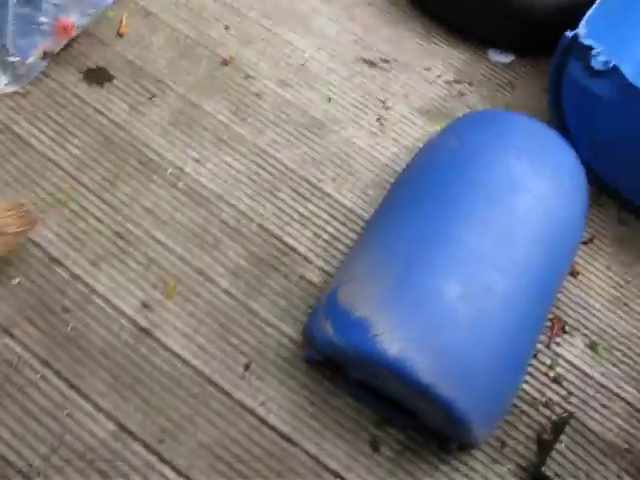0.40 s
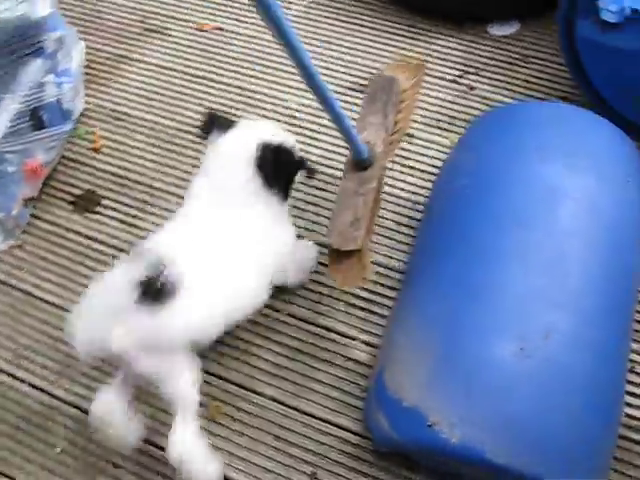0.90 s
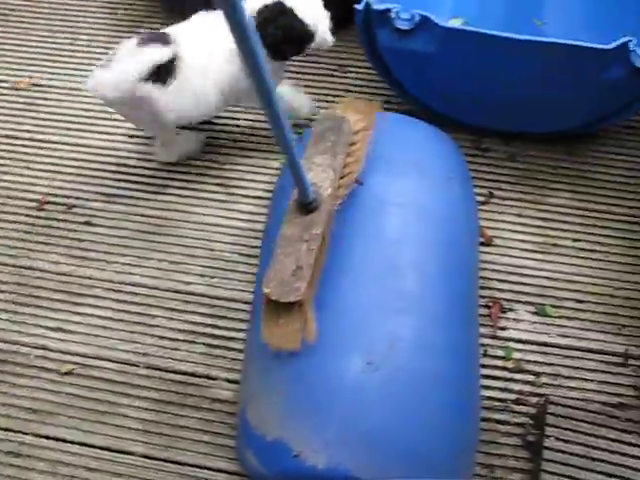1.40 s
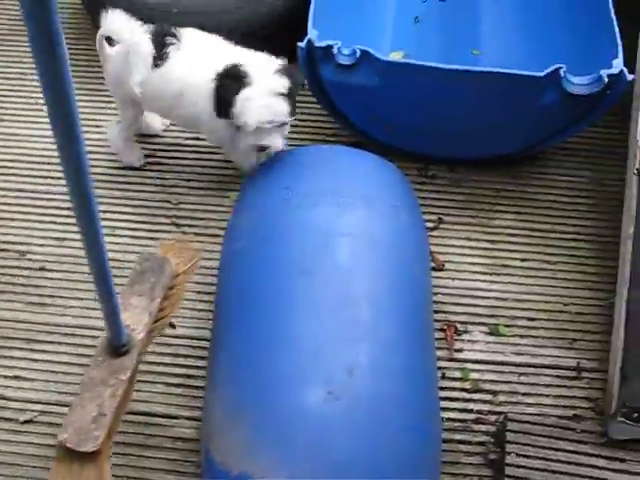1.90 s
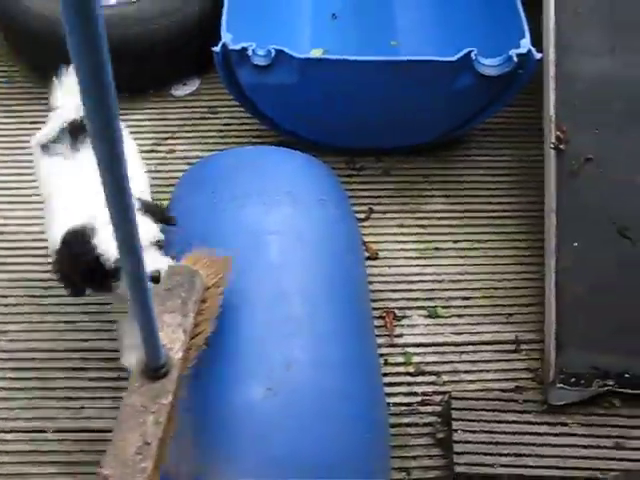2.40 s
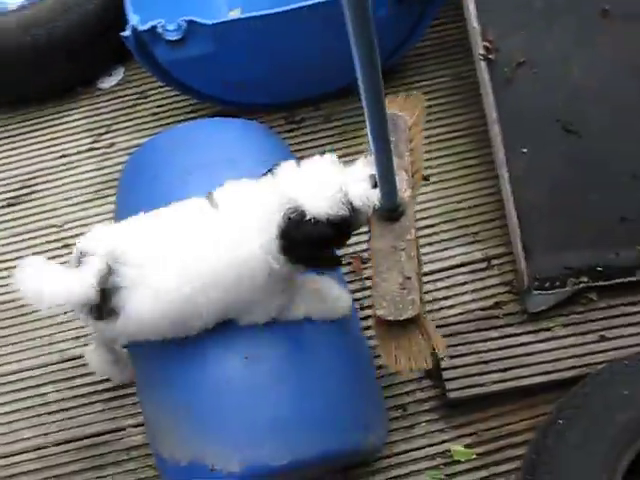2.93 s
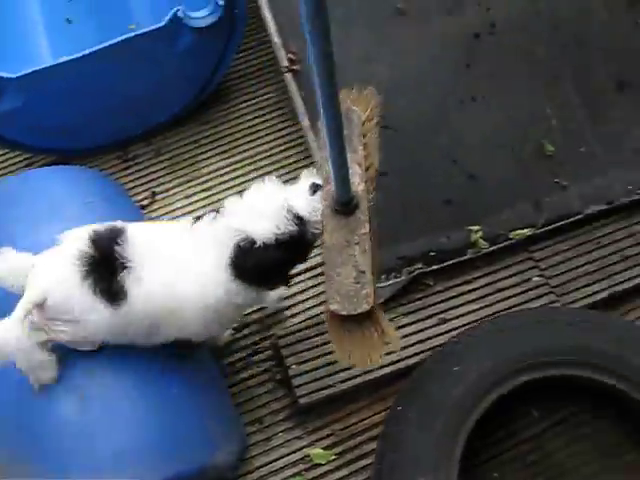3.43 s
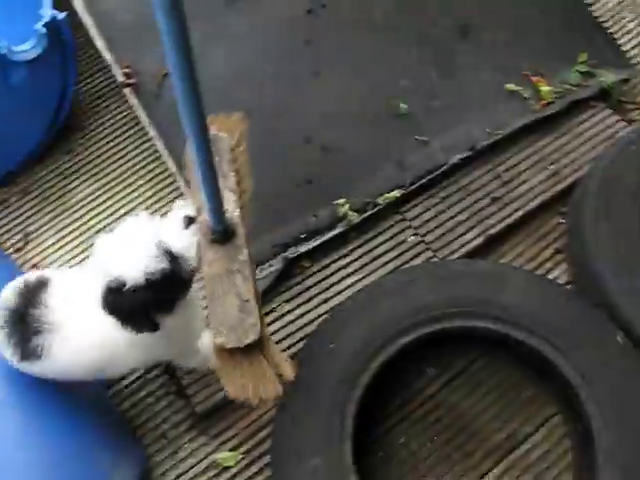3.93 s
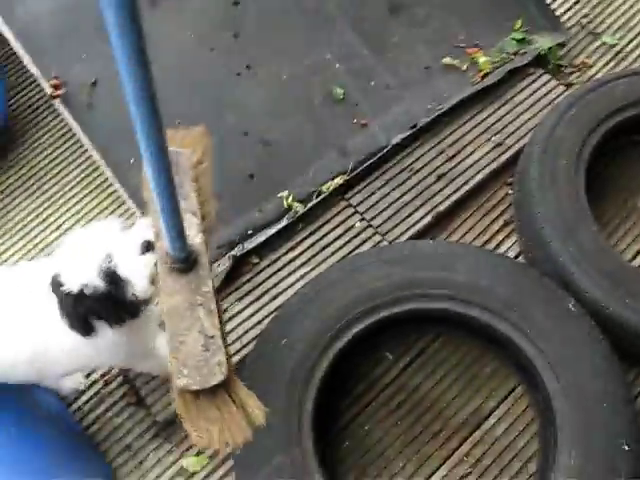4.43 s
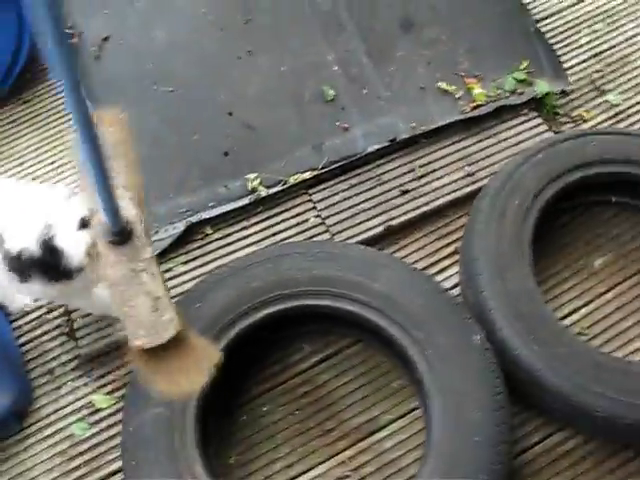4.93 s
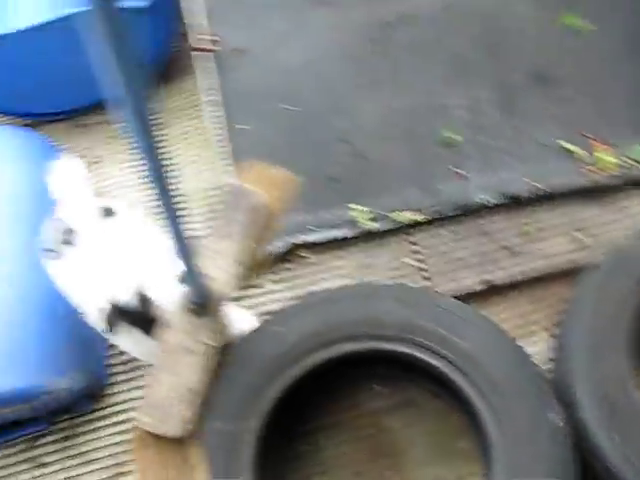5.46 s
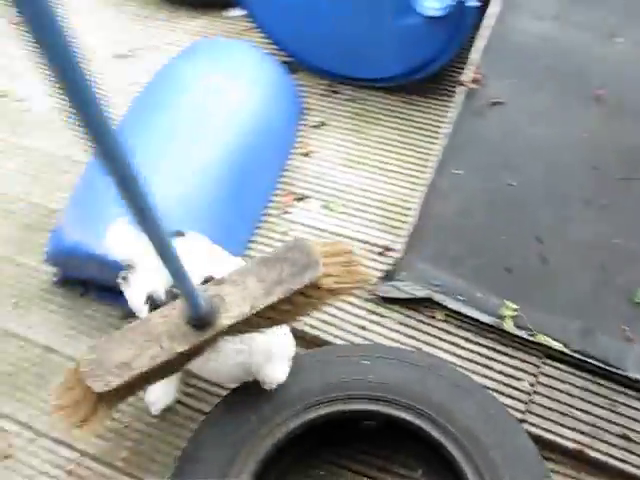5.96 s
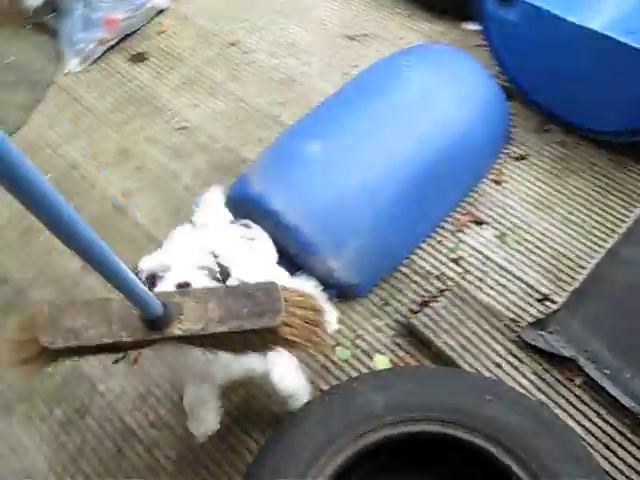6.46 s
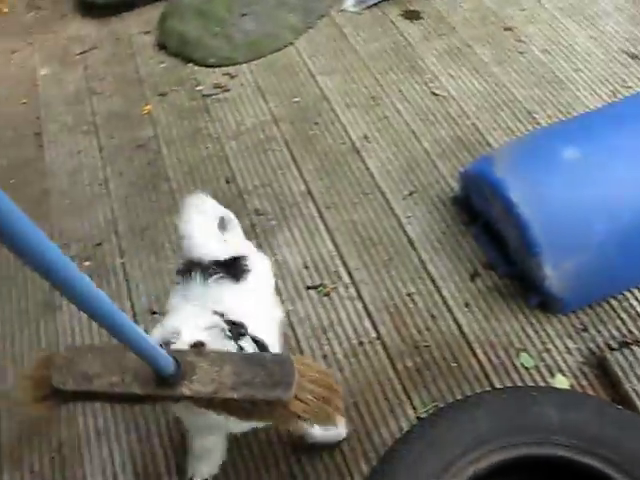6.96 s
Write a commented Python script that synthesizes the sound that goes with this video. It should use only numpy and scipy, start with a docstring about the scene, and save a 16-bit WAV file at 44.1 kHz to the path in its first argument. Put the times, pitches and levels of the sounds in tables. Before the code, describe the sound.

A puppy scrambles after a stiff broom on deck boards, with bristly scuffs, sharp claw clicks, hollow plastic barrel booms and quick little pants.

```python
"""A short scuff of bristles, then a soft thump and hard claw snaps: a puppy chases a stiff broom over
grooved deck boards and scrambles across a hollow plastic barrel. Bristles and paws scuff as clumps of tiny
slips, claws and teeth snap as bursts of cracks in small resonances, and the barrel booms as a bank of shell
modes. Pants and broom-head drags are noise in gliding resonances; shaped noise lies under it as the yard."""
import sys
import numpy as np
from scipy import signal
from scipy.io import wavfile
from scipy.ndimage import uniform_filter1d

SR = 44100
rng = np.random.default_rng(int(sys.argv[2]) if len(sys.argv) > 2 else 0)


def pcm_store(signal):
    """Save signal as 16-bit PCM."""
    levels = np.round(np.clip(np.atleast_2d(signal), -1, 1) * 32767)
    wavfile.write(sys.argv[1], SR, levels.astype(np.int16).T)


def rack_gain(trim_db):
    """Turn a fader trim in dB into the linear factor to multiply a signal by."""
    fader = np.asarray(trim_db, float)
    return 10 ** (fader / 20)


N = 313110  # samples


def evened(x):
    """Scales to unit power."""
    return x / np.sqrt(np.mean(x ** 2) + 1e-20)


def add(mix, s, sound):
    """Mixes a sound in at time s, cut off at the end of the mix."""
    part = mix[round(s * SR):][:len(sound)]
    part += sound[:len(part)]


def resonate(x, hz, width_hz):
    """Shifts the pitch curve hz down to zero, smooths, and shifts back: a resonance of gain 1."""
    turn = np.exp(2j * np.pi * np.cumsum(hz * np.ones(len(x))) / SR)
    decay = np.exp(-np.pi * width_hz / SR)
    return 2 * (turn * signal.lfilter([1 - decay], [1, -decay], x / turn)).real


def band(x, lo_hz, hi_hz, order=2):
    """Band-pass."""
    sos = signal.butter(order, [lo_hz, min(hi_hz, SR / 2.1)], "band", fs=SR, output="sos")
    return signal.sosfilt(sos, x)


# Spectrum of the yard noise. Each row: frequency in Hz, relative level in dB.
YARD_SPECTRUM = [(15, -51), (25, -6), (58, -14), (105, -1), (304, 2), (445, 0), (524, 0.5), (617, 0.5),
                 (687, 0.5), (1120, 0.5), (1680, -7.5), (1830, -8), (14800, -29.5), (16500, -28)]
YARD_DB = -47  # overall rms


def yard():
    """Distant traffic and air: random short-time spectra with faint patches."""
    frames, hz = N // 256 + 5, np.fft.rfftfreq(1024, 1 / SR)
    a, b, patches = rng.standard_normal((frames, 513, 3)).T
    patches = uniform_filter1d(patches, size=12, axis=0)  # over frequency
    patches = evened(uniform_filter1d(patches, size=14, axis=1))  # over time
    f, db = np.transpose(YARD_SPECTRUM)
    spectrum_db = np.interp(np.log(hz + 1), np.log(f + 1), db)
    z = (a + 1j * b) * rack_gain(spectrum_db[:, None] + 2.04 * patches)
    noise = signal.istft(z, nperseg=1024, noverlap=768)[1][:N]
    return rack_gain(YARD_DB) * evened(noise)


PATCHY_DB = 2.6  # rms depth of the colour patches


def patchy(x):
    """Bristles of different length come and go: the colour shifts in patches of about 500 Hz by 25 ms."""
    z = signal.stft(x, nperseg=256, noverlap=192)[2]
    patches = uniform_filter1d(rng.standard_normal(z.T.shape), size=16, axis=0)
    patches = evened(uniform_filter1d(patches, size=3, axis=1))
    return signal.istft(z * rack_gain(PATCHY_DB * patches.T), nperseg=256, noverlap=192)[1][:len(x)]


def scrape(level_db, hz, treble_db, grit_db=2.5, slips_per_s=6000, ticks_per_s=50):
    """Dense tiny slips of uneven size in clumps: rasp, broad scrape, treble hiss, bristles flicking free."""
    n = len(level_db)
    chance, sign, size = rng.random(n), rng.standard_normal(n), rng.exponential(1, n)
    clumps = rack_gain(1.9 * evened(uniform_filter1d(rng.standard_normal(n), size=180)))
    big_slips = (chance < slips_per_s / SR) * rack_gain(grit_db * np.minimum(size, 5))
    slips = evened(clumps * sign * (2.1 + big_slips))
    ticks = np.sign(sign) * (chance > 1 - ticks_per_s / SR) * rack_gain(0.87 * np.minimum(size, 3))
    slips = slips + 4 * ticks

    rasp = evened(resonate(resonate(slips, hz, 2000), hz, 2000))
    broad = evened(band(slips, 1100, 6030, order=1))
    body = evened(patchy(band(rasp + 6.5 * broad, 790, 7960)))

    fine, finest = slips * rng.choice([-1., 1.], (2, n))  # same grain, unrelated phase
    hiss = evened(band(fine, 5700, 12400, order=1)) + evened(band(finest, 10500, 15400))
    return rack_gain(level_db) * (0.7 * body + 0.42 * rack_gain(treble_db) * hiss)


RASP_HZ = 3100  # rasp pitch at full pressure

# Fur, paws and bristles in light contact between the strokes; values glide from row to row.
# Each row: time in seconds, level in dB, treble hiss gain in dB against that level.
SHUFFLE_CURVE = [(0.0, -51, -3), (0.3, -49, 2), (1.7, -53, -3), (2.45, -56, -1), (2.77, -46.5, -7),
                 (3.5, -41, -1), (3.6, -50, 0), (4.31, -52.5, -0.5), (4.61, -54.5, -2), (4.73, -47.5, -10),
                 (5.26, -46, -2), (5.56, -45.5, -7), (5.99, -44, -5), (6.53, -51.5, -1), (6.76, -45.5, -3),
                 (7.1, -55, -4)]


def shuffle():
    """The grain of the scrape, faint and unbroken."""
    s, level_db, treble_db = np.transpose(SHUFFLE_CURVE)
    t = np.arange(N) / SR
    return scrape(np.interp(t, s, level_db), RASP_HZ, np.interp(t, s, treble_db))


def rush(s, length, db, hz, width_hz):
    """Noise through a gliding resonance, with a thin whistle in it and a second resonance below or above."""
    air = rng.standard_normal(round(length * SR))
    glide = np.linspace(hz, 0.93 * hz, len(air))  # ends a little lower than it starts
    other = glide * (0.62 if hz > 4800 else 1.63)
    main = resonate(resonate(air, glide, width_hz), glide, width_hz)
    second = resonate(resonate(air, other, 500), other, 500)
    whistle = evened(resonate(air, glide, 90))
    puff = evened(main + 0.3 * second) + 0.18 * whistle
    return s, rack_gain(db) * evened(puff) * signal.windows.tukey(len(air), .35)


# The puppy's breaths. Each row: start in seconds, length in seconds, level in dB,
# mouth resonance at the start in Hz, width of each of its two passes in Hz.
PANTS = [(4.55, 0.11, -45, 2660, 250), (4.635, 0.104, -43, 3000, 453), (4.81, 0.13, -46, 5670, 1500),
         (4.985, 0.078, -41.5, 5550, 1100), (5.084, 0.13, -39, 5450, 1500), (5.204, 0.089, -38, 4270, 1210),
         (5.33, 0.079, -45, 4220, 1500), (5.459, 0.055, -43, 5050, 1510)]


def pant(s, length, db, mouth_hz, width_hz):
    """One breath: a rush of air coloured by the mouth."""
    return rush(s, length, db, mouth_hz, width_hz)


# The wooden broom head on the boards. Each row: start in seconds, length in seconds, level in dB,
# resonance at the start in Hz, width of each of its two passes in Hz.
DRAGS = [(0.232, 0.043, -46.5, 760, 200), (1.411, 0.036, -46, 3060, 250), (5.902, 0.033, -42, 2750, 500),
         (6.046, 0.0127, -38, 2730, 600), (6.89, 0.012, -45, 1570, 400), (2.655, 0.042, -36, 1080, 300),
         (4.763, 0.034, -41, 1810, 370), (5.167, 0.037, -35, 1620, 503), (5.946, 0.099, -38.5, 1680, 500),
         (6.735, 0.086, -34, 3540, 1200), (6.936, 0.015, -37, 1520, 700)]


def drag(s, length, db, wood_hz, width_hz):
    """One drag of the broom head: friction noise coloured by the wood."""
    return rush(s, length, db, wood_hz, width_hz)


# Modes of the barrel shell. Each row: frequency in Hz, width in Hz,
# relative strength in dB before division by the root of the width.
BARREL_MODES = [(88, 13, -17), (154, 26, -5.5), (250, 35, -2), (330, 53, -3.5), (403, 29.5, -0.5),
                (504, 61, -2.5), (600, 17, -6.5), (740, 150, -5.5), (1117, 79, -3), (1290, 400, -4)]


def barrel(drive, lean_hz, lean_db, deep_db):
    """The shell modes; those near lean_hz are lifted, and those below 200 Hz shift by deep_db."""
    boom = np.zeros(len(drive))
    for k, (hz, width_hz, db) in enumerate(BARREL_MODES):
        near_db = lean_db * np.exp(-(np.log(hz / lean_hz) / 0.3) ** 2) + deep_db * (hz < 200)
        mode = rack_gain(db + near_db) * resonate(drive, hz, width_hz) / np.sqrt(width_hz)
        boom += (-1) ** k * mode  # neighbours in opposite phase
    return boom


# The barrel rocks and grinds on the boards; the level glides from row to row.
# Each row: time in seconds, driving level in dB.
ROCKING = [(3.775, -39), (3.822, -15.5), (3.845, -14), (3.878, -19), (3.892, -31), (3.97, -53)]


def rocking(rows):
    """Rough rolling contact: softened noise shakes all the shell modes."""
    s, level_db = np.transpose(rows)
    t = np.arange(s[0], s[-1], 1 / SR)
    roughness = uniform_filter1d(rng.standard_normal(len(t)), size=32)
    boom = barrel(rack_gain(np.interp(t, s, level_db)) * roughness, 393, lean_db=6, deep_db=-3.0)
    rms_db = np.max(level_db) - 7.0
    return s[0], rack_gain(rms_db) * evened(boom) * signal.windows.tukey(len(t), .1)


# Paws landing on barrel and boards. Each row: start in seconds, peak level in dB,
# contact time in seconds (0.0005 at least), 60 dB decay of the chatter in seconds, favoured mode in Hz.
THUMPS = [(0.091, -37, 0.0027, 0.1, 230), (0.299, -30, 0.0011, 0.15, 483),
          (0.372, -29.5, 0.0018, 0.35, 278), (0.67, -20, 0.0021, 0.34, 310),
          (0.809, -26.5, 0.0029, 0.12, 553), (0.906, -35, 0.0035, 0.45, 495),
          (2.182, -30, 0.00089, 0.22, 305), (2.196, -26, 0.0047, 0.22, 185),
          (2.344, -38, 0.0035, 0.53, 193), (2.447, -36.5, 0.0027, 0.6, 253), (2.56, -14, 0.002, 0.48, 480),
          (2.665, -22, 0.0022, 0.19, 400), (2.673, -21.5, 0.0039, 0.35, 140),
          (2.749, -29, 0.00091, 0.29, 159), (2.814, -24.5, 0.00075, 0.68, 504),
          (2.853, -24, 0.003, 0.5, 423), (2.915, -23, 0.0011, 0.15, 310), (2.923, -10, 0.0033, 0.17, 387),
          (3.041, -22, 0.0044, 0.36, 407), (3.648, -28.5, 0.0031, 0.61, 376),
          (3.781, -20, 0.0045, 0.29, 156), (5.175, -43, 0.0042, 0.34, 208), (5.695, -34, 0.0029, 0.2, 212),
          (6.014, -33.5, 0.0032, 0.12, 140), (6.213, -36, 0.0022, 0.27, 330),
          (6.277, -28.5, 0.00046, 0.033, 780), (6.434, -30, 0.0026, 0.1, 250),
          (6.809, -33, 0.004, 0.18, 210), (6.983, -36.5, 0.0016, 0.54, 396)]
DEEP_DB, DEEP_DB_PER_S = -5.5, 24.5  # the longer the shell chatters, the more its deep modes sound


def thump(s, peak_db, contact, t60, hz):
    """A soft push with a harder claw knock at its start, then the shell chatters on against the boards."""
    t = np.arange(round(.3 * SR)) / SR
    push = np.sin(2 * np.pi * np.minimum(t[:600] / max(contact, .0005), 1))  # one cycle: in and back
    push[:12] += 5.0  # claw knock
    hits = rng.random(len(t)) < 1500 / SR  # about 1500 bounces per second
    bounces = .13 * rng.standard_normal(len(t)) * hits * rack_gain(-60 * t / max(t60, .01))
    bounces[0] = 1  # the landing itself
    drive = signal.oaconvolve(bounces, push)[:len(t)]
    boom = barrel(drive, hz, 10.6, DEEP_DB + DEEP_DB_PER_S * t60)
    return s, rack_gain(peak_db) * boom / abs(boom).max()


# Claws and teeth on hard surfaces. Each row: start in seconds, peak level in dB, burst length in seconds,
# favoured ring in Hz, dull body in dB (gain of the rings below 4500 Hz, ahead of a shared 22 dB lift).
SNAPS = [(0.188, -20, 0.0018, 5850, -11), (0.206, -9, 0.0028, 7540, -30), (0.314, -32, 0.0028, 3690, -11),
         (0.35, -28, 0.002, 3700, 2), (0.374, -19.5, 0.0017, 5570, -23), (0.395, -23, 0.0019, 2920, -18),
         (0.4217, -22.5, 0.0013, 2910, 0), (0.4417, -16.5, 0.00047, 3020, -25),
         (0.523, -27.5, 0.002, 6480, -14), (0.5601, -4, 0.0021, 7800, -20),
         (0.532, -30, 0.0015, 12000, -20), (0.601, -27, 0.002, 13400, -23), (0.611, -30, 0.002, 13500, -22),
         (0.621, -34, 0.003, 13400, -21), (0.6406, -27, 0.0022, 3100, -8), (0.676, -18, 0.0009, 2620, -25),
         (0.7768, -15.5, 0.0022, 3100, -27), (0.8007, -4.5, 0.00088, 9450, 3.5),
         (0.815, -21, 0.005, 3150, -17), (0.9118, -25, 0.0086, 3520, -27),
         (0.9557, -29, 0.0024, 13100, -26), (1.079, -32, 0.0021, 1980, -16),
         (1.092, -20, 0.0011, 13300, -31), (1.1493, -32, 0.0022, 2030, -12), (1.436, -38, 0.002, 8100, -25),
         (1.682, -37, 0.0023, 2390, 0), (1.548, -31, 0.0017, 2170, 6), (1.9237, -2.5, 0.0055, 8500, -7),
         (2.494, -35, 0.0024, 2540, -24), (2.56, -31, 0.011, 2440, -25), (2.663, -30, 0.0013, 2000, -4),
         (2.6886, -25, 0.0056, 3300, -26), (2.809, -24, 0.0048, 6000, -17), (2.9495, -24, 0.0028, 3100, -8),
         (3.2312, -24, 0.002, 6360, -11), (4.039, -29, 0.0011, 1990, 14), (4.0564, -27, 0.0042, 1950, -22),
         (4.0784, -25, 0.0016, 3370, -19), (4.1775, -21, 0.0024, 5000, -17),
         (4.2187, -14.5, 0.0015, 5300, -30), (4.338, -30, 0.0055, 5730, -11),
         (4.377, -31.5, 0.0014, 1930, -7), (4.7681, -19, 0.0015, 2840, -25),
         (4.921, -19.5, 0.0016, 5640, -17), (4.9711, -16.5, 0.0012, 7650, 6),
         (5.0426, -3.5, 0.0019, 9200, -10), (5.1492, -18, 0.0018, 5300, -11), (5.32, -3, 0.00058, 8000, -2),
         (5.399, -23.5, 0.0015, 2910, -18), (5.455, -25, 0.0036, 7740, -17), (5.471, -20, 0.0033, 4940, 0),
         (5.7596, -23, 0.0015, 2280, -23), (5.913, -21.5, 0.005, 2630, -2), (6.0877, -23, 0.0013, 3570, -7),
         (6.1837, -13, 0.0035, 7900, 17), (6.212, -25, 0.0015, 5600, 2), (6.2761, -21, 0.0029, 4140, -20),
         (6.338, -10, 0.0013, 7100, -20), (6.544, -12.5, 0.0029, 3100, -43), (6.558, -29, 0.001, 8000, -18),
         (6.576, -24, 0.00093, 5000, -15), (6.8454, -17.5, 0.0014, 8550, -10),
         (6.9378, -23, 0.0015, 1790, -8), (6.9504, -26, 0.001, 5000, -9)]
# Rings of the small stiff objects. Each row: frequency in Hz,
# base width in Hz (it sounds at 300 Hz plus 3.6 times this), relative level in dB.
SNAP_RINGS = [(2100, 170, -3), (3700, 520, -23), (5150, 99, 11.5), (7850, 160, 18), (9450, 180, 6),
              (9250, 130, -35.5), (12020, 350, 6), (12200, 280, -1.5)]


def snap(s, peak_db, burst, lean_hz, body_db):
    """A few milliseconds of tiny cracks ring a small stiff object; modes near lean_hz are favoured."""
    t = np.arange(round(.04 * SR)) / SR
    decay = rack_gain(-60 * np.maximum(t - burst, 0) / 0.004)  # steady for the burst, then 60 dB in 4 ms
    cracks = rng.standard_normal(len(t)) * (rng.random(len(t)) < .25) * decay
    cracks[0] = 3.2  # first contact
    ring = np.zeros(len(t))
    for hz, base_hz, db in SNAP_RINGS:
        gain_db = db + (body_db + 22.0) * (hz < 4500) - 2.3 * abs(np.log2(hz / lean_hz))
        ring += rack_gain(gain_db) * resonate(cracks, hz, 300 + 3.6 * base_hz)
    own = resonate(cracks, lean_hz, 0.75 * lean_hz)  # the claw's own note
    own = resonate(own, lean_hz, 0.75 * lean_hz)
    ring = band(ring / abs(ring).max() + 0.76 * own / abs(own).max(), 1170, 14400)
    return s, rack_gain(peak_db) * ring / abs(ring).max()


# Strokes of bristles and paws. Each row: start in seconds, swell in seconds, fade in seconds,
# level at full pressure in dB, treble hiss gain in dB against that level.
SCUFFS = [(0.0, 0.0072, 0.04, -34.5, -2.5), (.065, .02, 0.068, -51, 9), (.136, 0.0063, 0.069, -36.5, -2),
          (.155, 0.052, 0.11, -30, -6), (.2, 0.064, 0.034, -28.5, -9), (.31, 0.044, 0.068, -38, -14),
          (.372, 0.0037, 0.067, -36, 2), (0.421, 0.0028, 0.075, -35, -17), (.445, 0.027, 0.047, -38, -4),
          (0.601, 0.0022, 0.051, -52, 8), (.865, 0.058, 0.04, -38, 0), (1.7, 0.027, 0.066, -48.5, -12),
          (5.292, 0.0073, 0.016, -33.5, -3), (6.883, 0.015, 0.017, -39, -9), (.674, 0.0024, 0.095, -25, -5),
          (.69, 0.026, 0.041, -21.5, -4.5), (0.757, 0.023, 0.16, -37.5, -8), (.81, 0.0034, 0.51, -42, -7),
          (1.002, 0.027, .1, -53, -10), (1.542, 0.008, 0.0098, -41.5, -21), (1.963, 0.0085, 0.2, -42, -22),
          (2.34, 0.0027, 0.13, -37.5, -3), (2.441, 0.055, 0.015, -45, -1), (2.576, 0.0097, 0.037, -26, 1),
          (2.661, 0.11, 0.29, -34, -7.5), (2.811, 0.0024, 0.13, -26, -4), (2.951, 0.0033, 0.13, -24.5, -4),
          (2.97, 0.038, 0.053, -19, -6), (3.05, 0.045, 0.48, -46, -10), (3.17, 0.071, 0.043, -31, -16),
          (3.275, 0.04, 0.2, -30.5, -1.5), (3.41, .064, 0.14, -33.5, -16), (3.491, 0.078, 0.1, -24, -7),
          (3.679, 0.031, 0.14, -41.5, -3), (3.769, 0.049, .1, -34, -6), (3.906, 0.044, 0.035, -26.5, -13),
          (4.038, 0.021, 0.06, -39, -16), (4.17, 0.058, 0.061, -37.5, -4),
          (4.55, 0.0047, 0.26, -39.5, -6.5), (4.7, 0.097, 0.034, -37, -2.5), (4.81, 0.046, 0.2, -38, -5),
          (5.06, 0.1, 0.11, -37.5, -10), (5.149, 0.026, 0.13, -28, -10), (5.31, 0.0049, 0.17, -32, -8),
          (5.409, 0.061, .18, -41, -17), (5.596, 0.047, 0.056, -31.5, -3), (5.711, 0.079, .1, -35, -10),
          (5.77, 0.057, 0.087, -31.5, -4.5), (5.905, 0.041, 0.29, -32.5, -1),
          (5.959, 0.039, .08, -30.5, -2.5), (6.059, 0.056, 0.17, -39.5, -18),
          (6.221, 0.078, 0.16, -40.5, -10), (6.335, 0.002, 0.01, -24, -21), (6.549, .003, 0.062, -39, 3),
          (6.56, 0.089, 0.23, -35, -9.5), (6.7, .08, 0.088, -26, -7.5), (6.91, 0.047, 0.016, -39.5, -20),
          (6.959, 0.064, 0.082, -33.5, -5.5)]
TOUCH_DB, FADE_DB = -11, -26  # level at first touch and after the fade time, against full pressure
RASP_SAG_HZ_PER_DB = 71  # the rasp sinks as the pressure eases


def scuff(s, swell, fade, peak_db, treble_db):
    """One stroke: it touches down, presses up to its peak and eases off."""
    t = np.arange(round(.5 * SR)) / SR
    pressure_db = np.where(t < swell, TOUCH_DB * (1 - t / swell), FADE_DB * (t - swell) / fade)
    hz = np.maximum(RASP_HZ + RASP_SAG_HZ_PER_DB * pressure_db, 1500)
    stroke = scrape(peak_db + pressure_db, hz, treble_db)
    return s, stroke * signal.windows.tukey(len(t), .008)


def scene():
    """All sources in the open air, with a quick echo from the deck."""
    near = shuffle()
    for source, table in ((pant, PANTS), (drag, DRAGS), (thump, THUMPS), (snap, SNAPS), (scuff, SCUFFS)):
        for row in table:
            add(near, *source(*row))
    add(near, *rocking(ROCKING))
    echo = np.zeros(N)
    add(echo, .0031, rack_gain(-28) * near)
    return (near + echo + yard())[None]


def roll_off(x):
    """The treble ends steeply here."""
    return signal.sosfilt(signal.butter(12, 16980, fs=SR, output="sos"), x)


def record(dry):
    """The small microphone's bass cut at 62 Hz and band limit at 15.9 kHz."""
    thin = signal.sosfilt(signal.butter(3, 62, "high", fs=SR, output="sos"), dry)
    low_pass = signal.firwin(255, 15900, window=("kaiser", 3), fs=SR)
    limited = signal.oaconvolve(thin, low_pass[None], "same")
    return roll_off(limited)


dry = scene()
out = record(dry)
pcm_store(out)
```